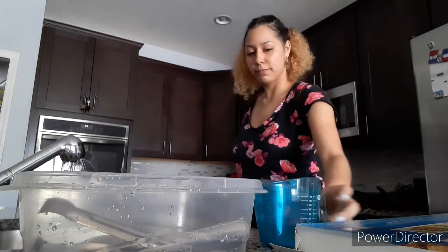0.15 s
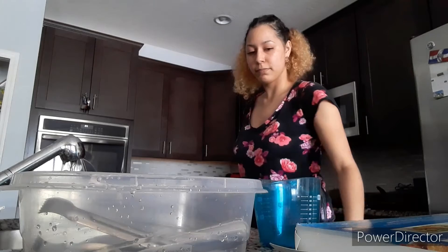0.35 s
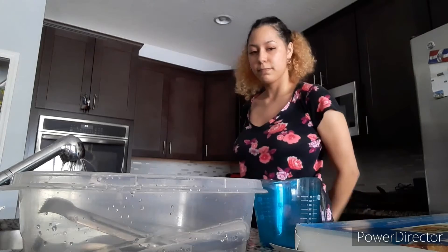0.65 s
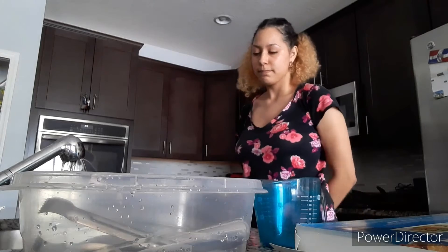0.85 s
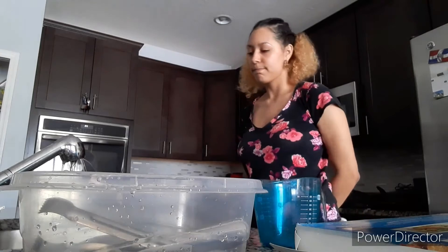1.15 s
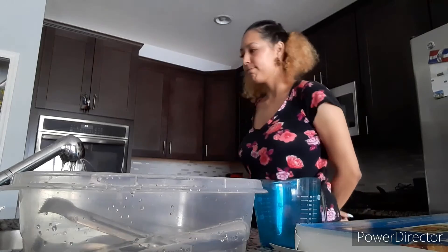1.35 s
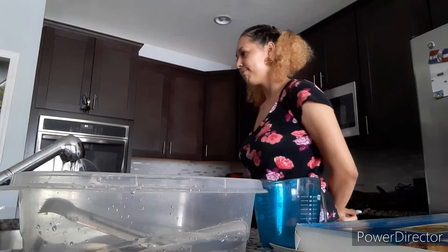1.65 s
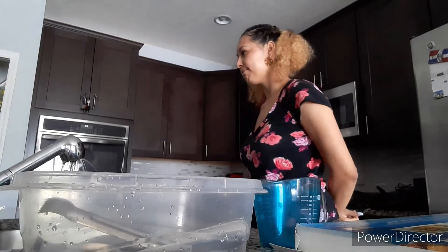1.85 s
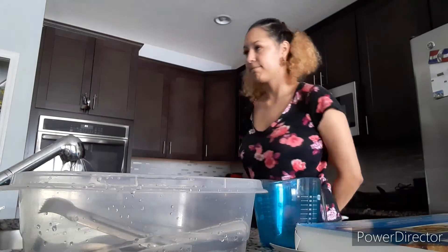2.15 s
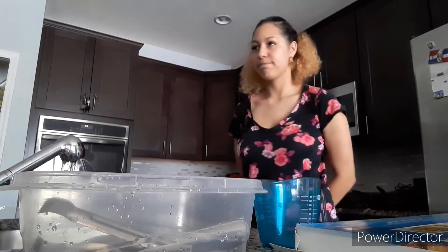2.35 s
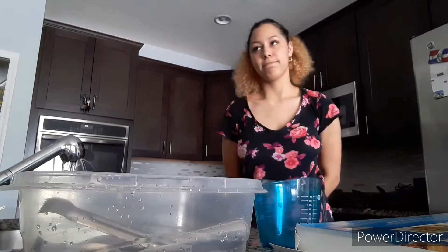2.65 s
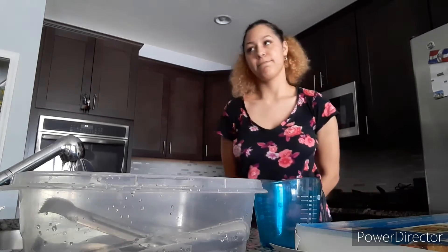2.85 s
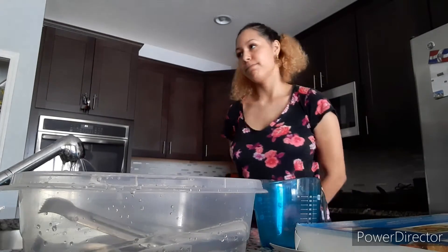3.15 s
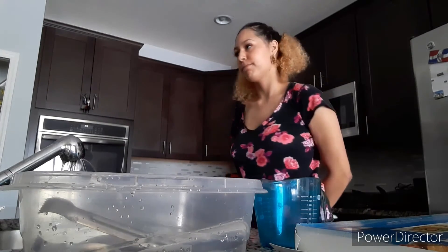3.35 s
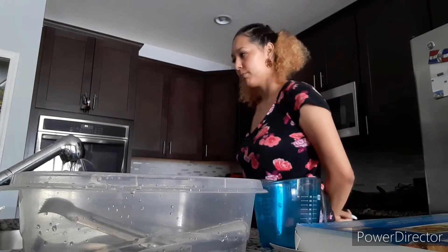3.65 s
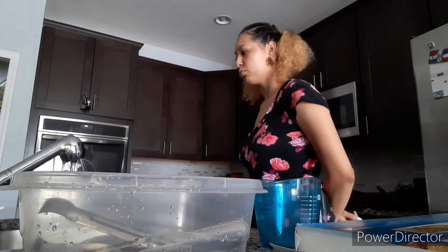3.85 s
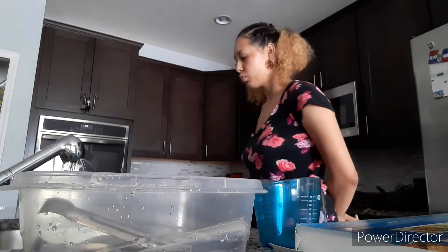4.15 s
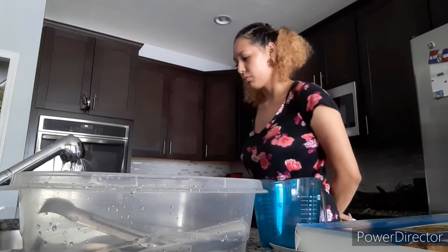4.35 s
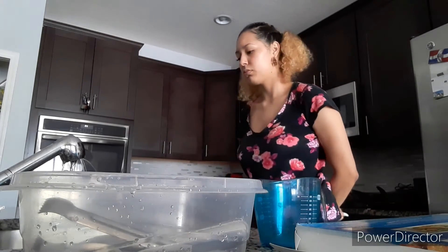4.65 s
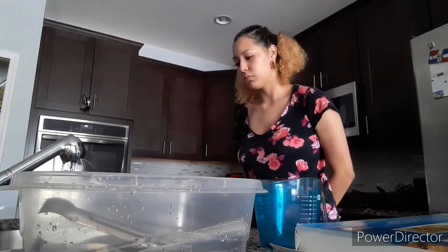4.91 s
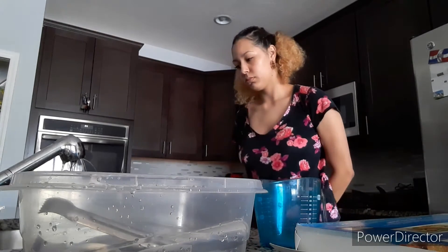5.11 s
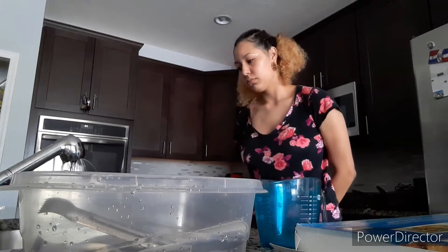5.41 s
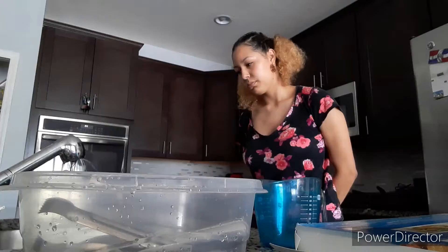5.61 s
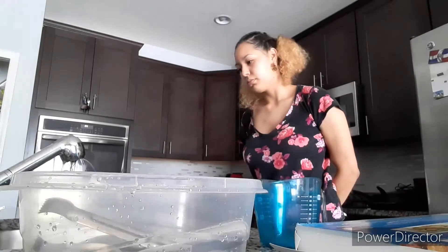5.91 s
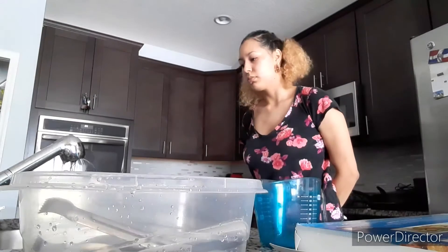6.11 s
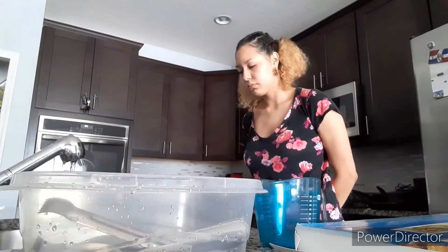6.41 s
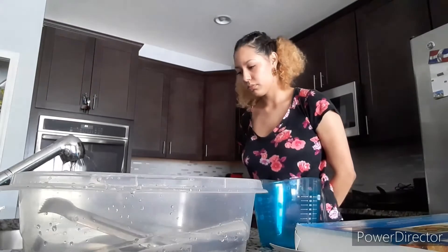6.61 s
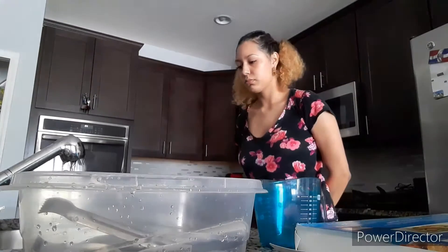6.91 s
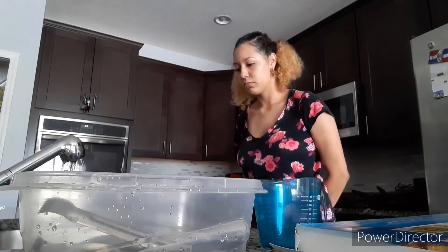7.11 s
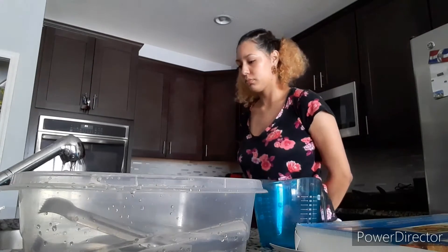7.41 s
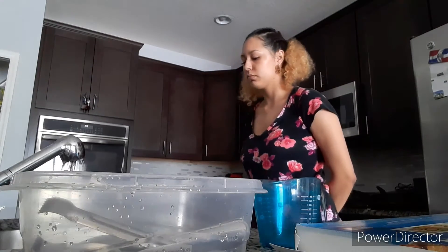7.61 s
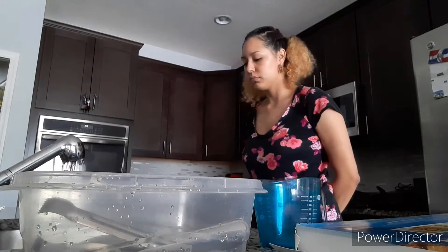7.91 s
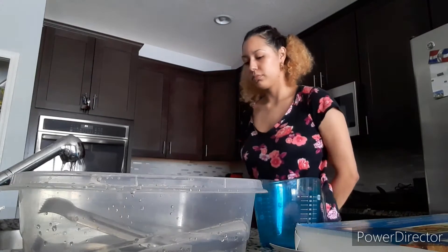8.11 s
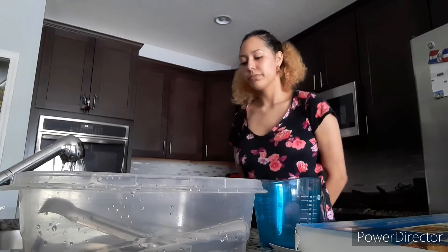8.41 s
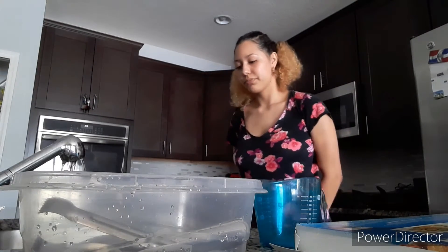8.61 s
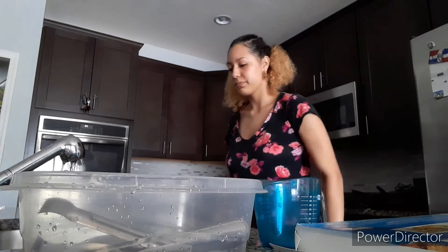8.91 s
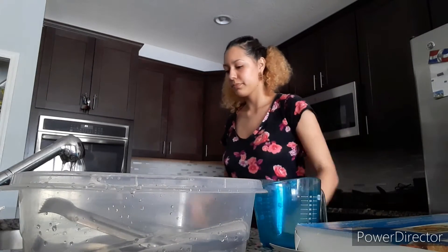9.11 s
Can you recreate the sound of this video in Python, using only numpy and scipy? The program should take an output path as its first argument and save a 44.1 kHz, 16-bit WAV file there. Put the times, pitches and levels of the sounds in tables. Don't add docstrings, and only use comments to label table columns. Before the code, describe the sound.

One hard, ringing cup knock at the start, followed by steady thin trickling with bright chirping drops over a low hollow plastic drone.

```python
import sys
import numpy as np
from scipy import signal
from scipy.fft import rfft, irfft, next_fast_len
from scipy.io import wavfile
from scipy.ndimage import uniform_filter1d

SR = 44100
rng = np.random.default_rng(int(sys.argv[2]) if len(sys.argv) > 2 else 0)


def to_linear_factor(level_db):
    exponent = np.asarray(level_db, float) / 20
    return 10 ** exponent


def unload_wav(signal):
    wavfile.write(
        sys.argv[1],
        SR,
        np.round(np.clip(np.atleast_2d(signal).T, -1, 1) * 32767).astype(np.int16),
    )


N = 408366


def tint(x, points):
    hz, db = np.transpose(points)
    size = next_fast_len(len(x) + SR)
    f = np.fft.rfftfreq(size, 1 / SR) + 1
    gain = to_linear_factor(np.interp(np.log(f), np.log(hz), db))
    return irfft(rfft(x, size) * gain, size)[:len(x)]


def ring(x, modes):
    out = 0
    for hz, width, db in modes:
        b, a = signal.iirpeak(hz, hz / width, SR)
        out = out + to_linear_factor(db) * signal.lfilter(b, a, x)
    return out


def level(x, db):
    return x * to_linear_factor(db) / np.sqrt(np.mean(x ** 2))


def walk(rate):
    hold = int(SR / rate)
    steps = np.repeat(rng.standard_normal(N // hold + 1), hold)
    slewed = uniform_filter1d(uniform_filter1d(steps, hold), hold)
    return 2.02 * slewed[:N]


# (frequency [Hz], decay by 60 dB [s])
ROOM_DECAY = [(200, 0.43), (700, 0.75), (2500, 0.67), (7000, 0.89), (15000, 0.51)]


def kitchen(echoes, tail_db, build_s):
    t = np.arange(SR) / SR
    hz, t60 = np.transpose(ROOM_DECAY)
    tail = 0
    for centre in 88 * 2. ** np.arange(8):
        edges = [centre / np.sqrt(2), min(centre * np.sqrt(2), 20000)]
        octave = signal.butter(2, edges, "bandpass", fs=SR, output="sos")
        decay = np.interp(np.log(centre), np.log(hz), t60)
        tail = tail + signal.sosfilt(octave, rng.standard_normal(SR)) * to_linear_factor(-60 * t / decay)
    out = to_linear_factor(tail_db) * tail * (1 - np.exp(-(t / build_s) ** 2))
    for delay, db, smear in echoes:
        late = np.maximum(t - delay, 0)
        scatter = rng.standard_normal(SR) if smear else 1
        burst = (t >= delay) * np.exp(-late / (smear + 1e-6)) * scatter
        out = out + to_linear_factor(db) * burst / np.sqrt(np.sum(burst ** 2))
    return out


# (frequency [Hz], density [dB per Hz])
RUSH_COLOUR = [(15, -63), (25, 3), (148, -25), (248, 5.5), (361, -10), (672, -7.5), (981, -16), (1150, -31),
               (7630, -27), (15800, -27.5)]


def rush():
    return level(tint(rng.standard_normal(N), RUSH_COLOUR), -56)


# (time [s], break-up into spray [dB], drumming force on the tub [dB])
STREAM = [(0.0, -54.5, -48.5), (0.64, -60.5, -48), (1.13, -53.5, -48.5), (1.49, -42.5, -44),
          (1.73, -53.5, -46.5), (2.24, -53.5, -48.5), (2.53, -58, -49), (3.12, -50.5, -47),
          (3.46, -57, -51), (4.0, -52, -45.5), (4.23, -62, -48), (4.62, -53, -48), (5.7, -56.5, -48),
          (6.06, -52.5, -49.5), (6.29, -59, -49), (7.0, -56.5, -48), (7.84, -56.5, -48.5),
          (9.26, -57.5, -49.5)]


def stream():
    s, spray_db, force_db = np.transpose(STREAM)
    t = np.arange(N) / SR
    return np.interp(t, s, spray_db), np.interp(t, s, force_db)


def drone(modes, flow_db):
    noise = rng.standard_normal(N)
    out = 0
    for k, (hz, width, db) in enumerate(modes):
        out = out + (-1) ** k * ring(noise, [(hz, width, db - 10 * np.log10(width))])
    return level(out, 0) * to_linear_factor(flow_db)


# (frequency [Hz], width [Hz], level [dB])
TUB_MODES = [(59.4, 21, -13), (116.8, 4.5, -11.5), (196.2, 19.4, -3), (211.6, 3.4, -1.5), (236.4, 9.9, 4),
             (274.1, 10.4, 2.5), (335, 27, -11)]
# (frequency [Hz], width [Hz], level [dB])
WALL_MODES = [(457, 37, 0), (582, 26, -1.5), (644.4, 12, -3), (705, 24, -3.5), (1190, 193, -5.5)]


def tub(force_db, shake):
    gurgle = walk(28)
    base_db = force_db + 13.5 * shake - 1.0
    walls_db = -57.5 + 0.95 * (force_db + 49) + 25 * shake
    base = drone(TUB_MODES, base_db + 0.64 * gurgle)
    return base + drone(WALL_MODES, walls_db + 1.5 * gurgle)


# (frequency [Hz], width [Hz], level [dB])
BODY_MODES = [(670, 66, -4), (778, 117, 0.5), (1176, 75, -4), (288, 61, -18)]
# (frequency [Hz], width [Hz], level [dB])
RIM_MODES = [(700, 400, -3), (1200, 200, -8), (2430, 450, 0), (2900, 300, -14), (4550, 500, -7),
             (4900, 350, -12), (6150, 600, -13), (7700, 700, -20), (11000, 7000, -33)]
# (frequency [Hz], width [Hz], level [dB])
RIM_TONES = [(2384, 4.8, 9), (2730, 12, 3), (4550, 13, -18)]
# (time [s], body level [dB], rim level [dB])
CUP_BLOWS = [
    (-.03, -9, 0),
    (.0232, 0, -12),
]
# (delay [s], level [dB], smear [s])
CUP_ECHOES = [(0, 1, 0), (.0052, -5, 0), (.017, -3, 0), (.0225, -9, 0), (.0288, -10, 0)]


def cup():
    lead = 2205
    body, rim = np.zeros((2, SR + lead))
    for s, body_db, rim_db in CUP_BLOWS:
        at = lead + int(s * SR)
        body[at] = -to_linear_factor(body_db + 28.5)
        rim[at] = to_linear_factor(rim_db + 20)
    body = signal.lfilter(np.hanning(36) / 18, 1, body)
    struck = ring(body, BODY_MODES) + ring(rim, RIM_TONES)
    for hz, width, db in RIM_MODES:
        struck = struck + ring(ring(rim, [(hz, width, db)]), [(hz, width, 0)])
    room = kitchen(CUP_ECHOES, tail_db=-31.5, build_s=0.0029)
    wet = signal.fftconvolve(struck, room)[lead:]
    return np.pad(wet, (0, N - len(wet)))


def bubbles(s, db, hz, glide_oct, tick_db, length_s):
    u = np.linspace(-2.5, 2.5, int(length_s * SR))
    octaves = np.multiply.outer(np.clip(glide_oct, .05, 1.3), u)
    freq = np.minimum(hz[:, None] * 2 ** octaves, .45 * SR)
    note = np.exp(-u ** 2 / 4) * np.sin(2 * np.pi * np.cumsum(freq, axis=1) / SR)
    note = note / np.sqrt(np.sum(note ** 2, axis=1, keepdims=True))
    note[:, len(u) // 3] += to_linear_factor(tick_db)
    out = np.zeros(N + len(u))
    places = (s * SR).astype(int)[:, None] + np.arange(len(u))
    np.add.at(out, places, to_linear_factor(db)[:, None] * note)
    return out[:N]


def spray(flow_db, count):
    when, size, pitch, glide = rng.random((count, 4)).T
    s = when * (N - 1) / SR
    db = flow_db[(s * SR).astype(int)] + 11 * size ** 2
    hz = 1500 * 2 ** (3.35 * pitch)
    return bubbles(s, db, hz, 0.12 + 0.27 * glide, tick_db=-12.0, length_s=.002)


# (time [s], level [dB], pitch [Hz])
SPIT_DROPS = [(0.619, -49.5, 12900), (1.633, -52, 9600), (2.12, -53.5, 13200), (2.352, -54, 11500),
              (3.441, -61, 11200), (4.017, -54, 12020), (4.132, -51.5, 11900), (4.369, -58, 8900),
              (5.372, -57, 10000), (5.778, -51, 9900), (6.58, -48.5, 9500), (6.686, -52.5, 12500),
              (6.757, -56.5, 13800), (7.053, -57, 9700), (7.142, -52.5, 12500), (7.34, -54, 12700),
              (7.929, -55, 13300), (8.584, -54, 13700), (8.7, -57.5, 10600), (8.98, -57.5, 7100)]


def spits():
    s, db, hz = np.transpose(SPIT_DROPS)
    return bubbles(s, db + 21.5, hz, 0.46, tick_db=-4, length_s=0.0019)


# (time [s], level [dB], middle pitch [Hz], glide spread [octaves])
SPLASH_DROPS = [(0.346, -48, 4500, 1.12), (0.79, -52, 4200, 1.13), (1.02, -57.5, 5800, 0.59),
                (1.11, -49, 4270, 1.04), (1.173, -50.5, 5200, 0.9), (2.17, -49.5, 5030, 1.3),
                (2.393, -49.5, 4430, 0.69), (2.603, -45, 4130, 0.54), (2.732, -54, 8110, 0.57),
                (2.911, -46, 8000, 1.32), (3.156, -49.5, 6000, 1), (3.452, -55, 4950, 0.72),
                (3.676, -47, 9300, 1.46), (3.871, -56, 6250, 0.6), (4.502, -49, 4600, 1.1),
                (4.576, -52, 7550, 0.65), (4.677, -50.5, 8600, 0.95), (5.093, -45.5, 3970, 0.77),
                (5.19, -49.5, 8960, 0.81), (5.493, -42.5, 5930, 0.7), (5.685, -52.5, 7600, 0.85),
                (5.981, -50.5, 5830, 0.58), (6.366, -52.5, 4830, 0.79), (6.91, -40.5, 5400, 0.52),
                (7.413, -48, 10300, 0.74), (7.655, -53, 4560, 0.74), (7.751, -37, 4830, 0.65),
                (8.202, -52.5, 3960, 0.84), (8.426, -42, 7500, 0.73), (1.235, -33, 2490, 0.39)]


def splashes():
    s, db, hz, glide_oct = np.transpose(SPLASH_DROPS)
    return bubbles(s, db + 21, hz, 0.897 * glide_oct, tick_db=-14.5, length_s=.0025)


# (time [s], level [dB], pitch [Hz], tick against bubble [dB])
PLINK_DROPS = [(0.654, -51, 3120, 5), (0.854, -51, 2400, -5), (1.237, -55, 4500, -24),
               (1.295, -44, 2860, -22), (1.487, -47.5, 3080, -12), (1.692, -53.5, 3490, -24),
               (1.945, -50, 4900, -24), (3.079, -48.5, 2400, -14), (3.129, -50.5, 3740, -1),
               (3.6, -62, 2950, 16), (3.94, -58, 4570, 0), (4.04, -70, 3300, 2), (4.203, -63, 4200, 19),
               (4.429, -57, 4770, 3), (4.946, -51.5, 2750, 5), (5.415, -51, 3150, -4),
               (5.767, -43.5, 2900, -3.5), (6.266, -57, 4440, 8), (6.404, -41, 2400, -3),
               (6.423, -56, 3170, -19), (7.2, -48.5, 6860, 3), (7.226, -51.5, 5680, 7.5),
               (7.695, -47, 2690, 5), (8.327, -44.5, 2690, -2), (8.504, -75, 4370, -5),
               (8.516, -59.5, 1190, -24), (8.74, -59, 6200, -12), (8.802, -56, 5340, -9),
               (9.161, -53.5, 6600, -13)]


def plinks():
    s, db, hz, tick_db = np.transpose(PLINK_DROPS)
    core = bubbles(s, db + 20.5, hz, 0.2, tick_db - 9, length_s=.0028)
    skirt = bubbles(s, db + 16.5, 1.322 * hz, 0.637, tick_db=-37, length_s=0.00248)
    return core + skirt


# (frequency [Hz], width [Hz], level [dB])
BASIN_MODES = [(2400, 170, -9), (2900, 570, -30), (4150, 290, -9.5), (4780, 280, -8), (5330, 750, -4),
               (7670, 400, -1.5)]
# (delay [s], level [dB], smear [s])
TUB_ECHOES = [(0, 0, .0012), (.002, 0, .002), (.0088, 1, .001), (.0165, 0, .003), (.023, 2.5, .02)]


def water(spray_db, shake):
    drops = plinks() + splashes() + spits()
    drops = drops + spray(spray_db + 24 * shake + 3.5, count=1200)
    drops = drops + ring(drops, BASIN_MODES)
    room = kitchen(TUB_ECHOES, tail_db=-24, build_s=0.0063)
    return signal.fftconvolve(drops, room)[:N]


def scene():
    spray_db, force_db = stream()
    shake = np.exp(-np.arange(N) / SR / 0.078)
    return (rush() + tub(force_db, shake) + cup() + water(spray_db, shake))[None]


def roll_off(x):
    return signal.sosfilt(signal.butter(12, 16790, fs=SR, output="sos"), x)


# (frequency [Hz], gain [dB])
MIC_COLOUR = [(20, -53), (45, -8.5), (100, 3), (2000, 0.5), (2400, -1.5), (4000, -1), (5300, -3),
              (6600, -1), (7700, 0), (8700, -2.5), (12500, 4), (15500, 4), (15750, -66.5)]


def record(dry):
    mix = tint(dry[0], MIC_COLOUR)[None]
    return roll_off(mix)


dry = scene()
out = record(dry)
unload_wav(out)
```